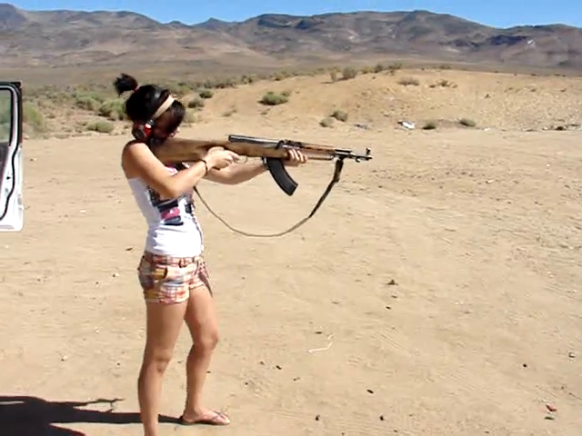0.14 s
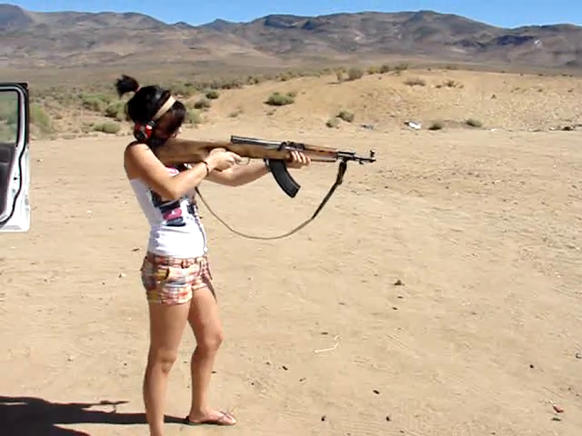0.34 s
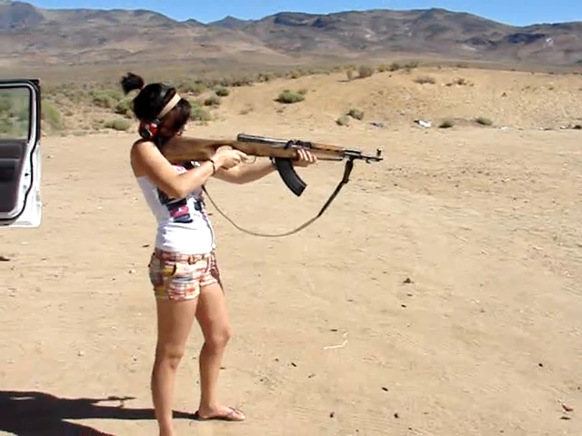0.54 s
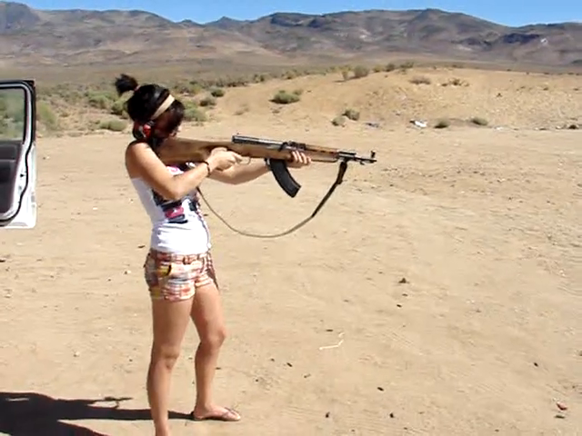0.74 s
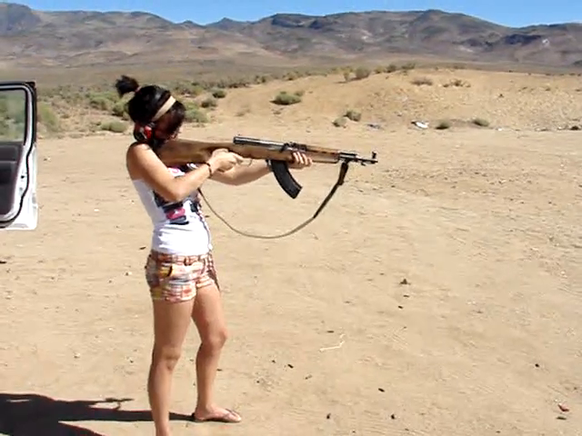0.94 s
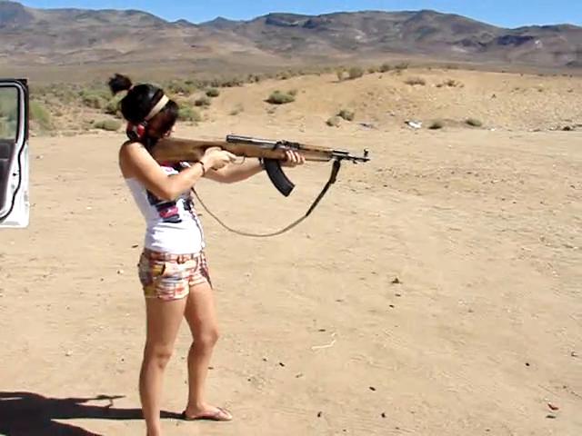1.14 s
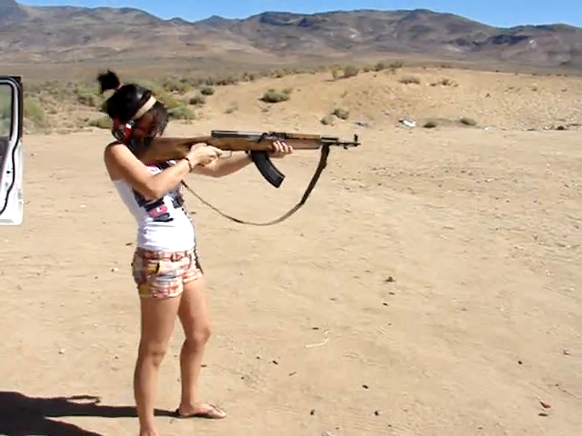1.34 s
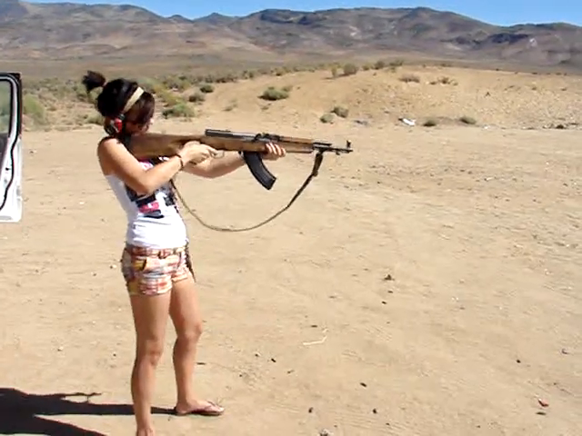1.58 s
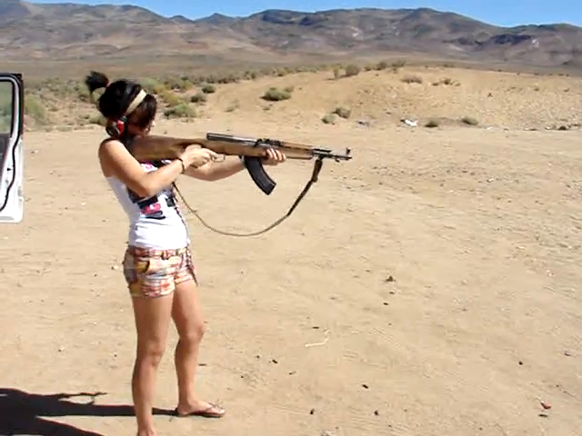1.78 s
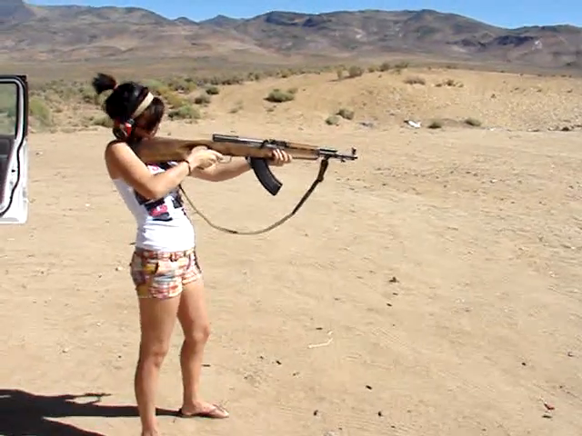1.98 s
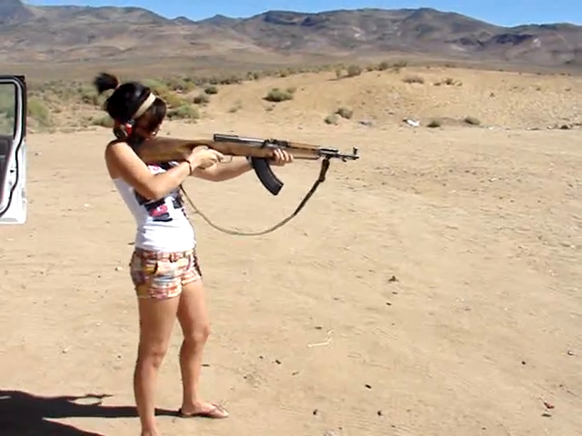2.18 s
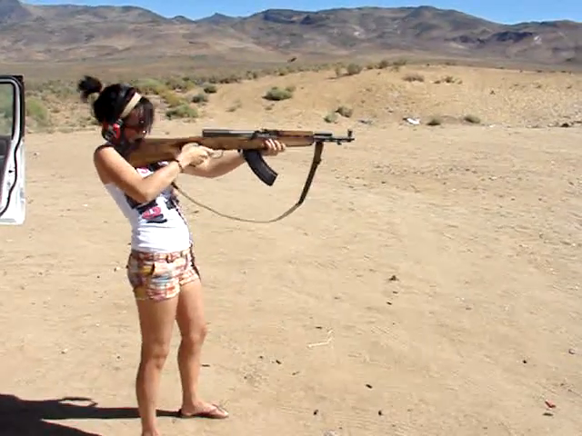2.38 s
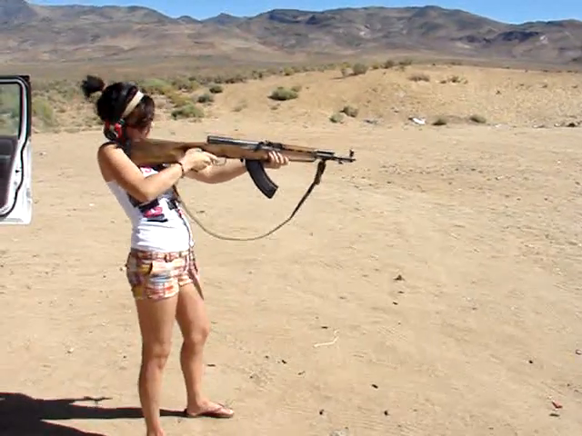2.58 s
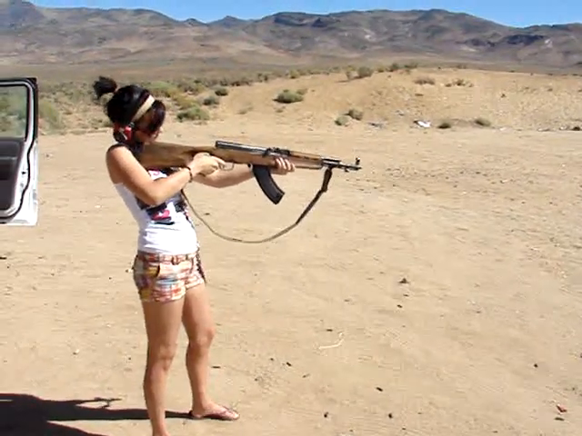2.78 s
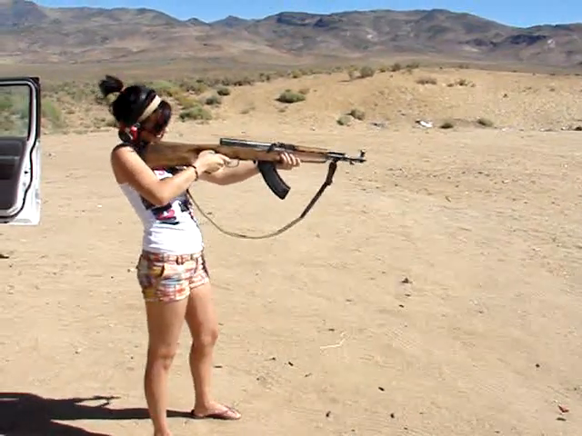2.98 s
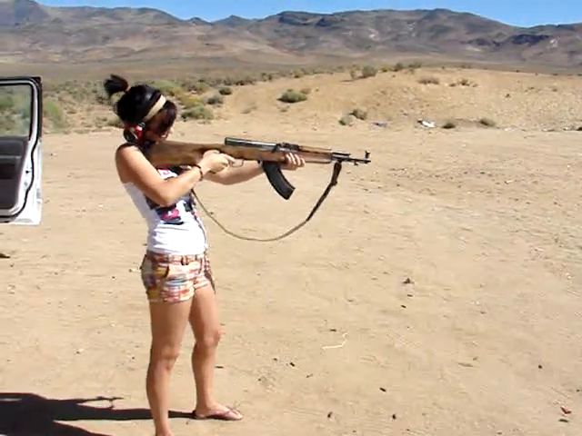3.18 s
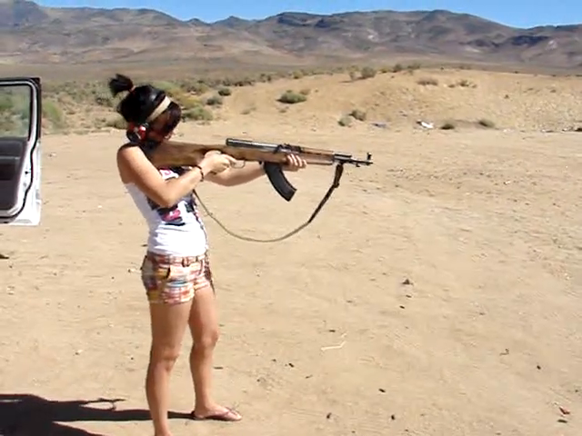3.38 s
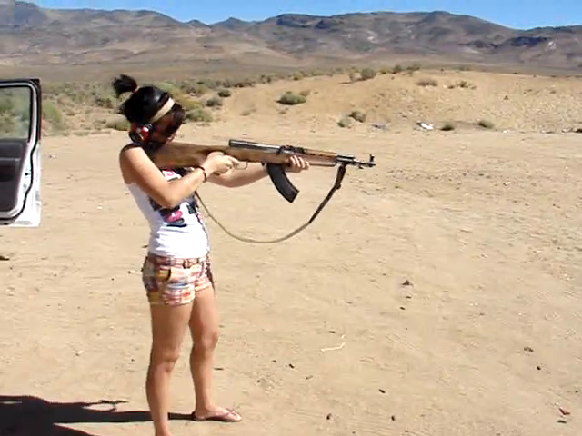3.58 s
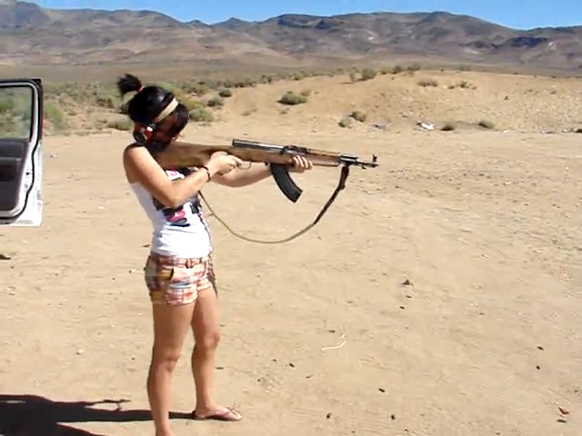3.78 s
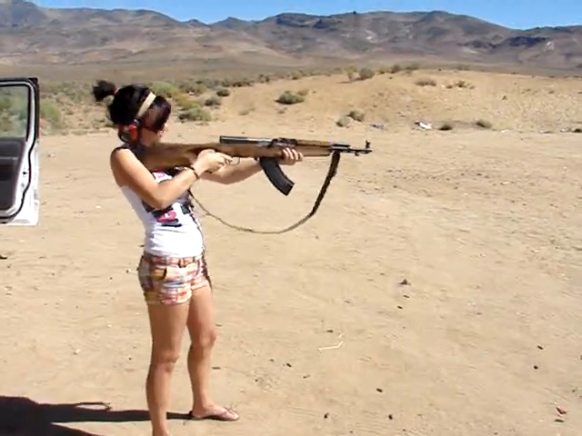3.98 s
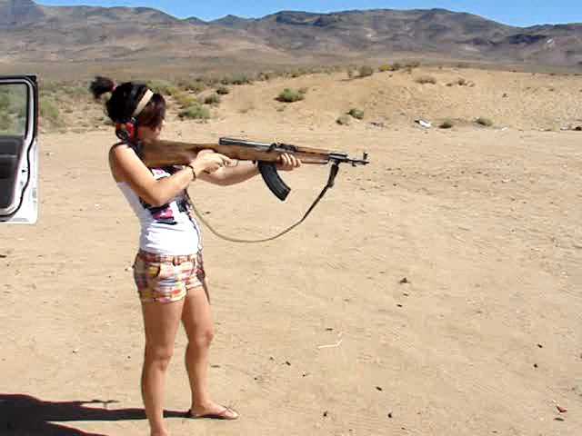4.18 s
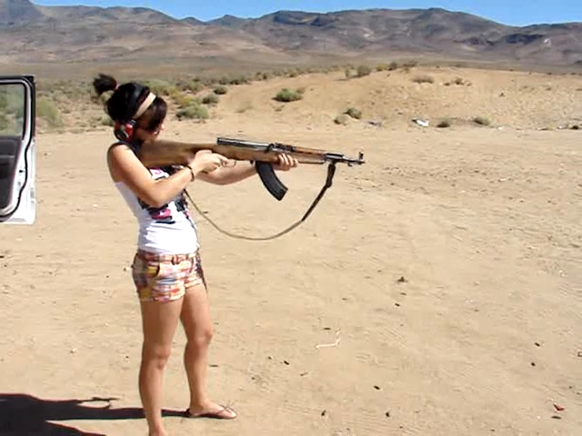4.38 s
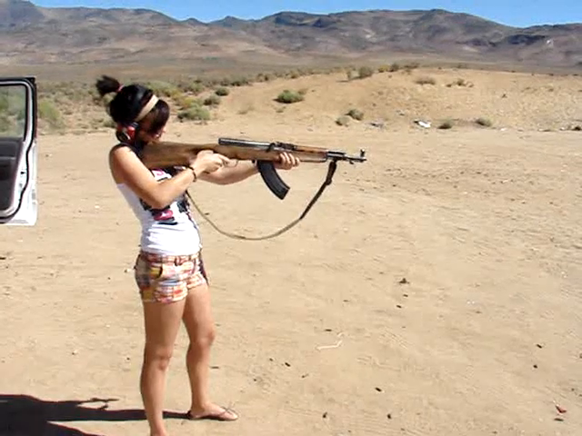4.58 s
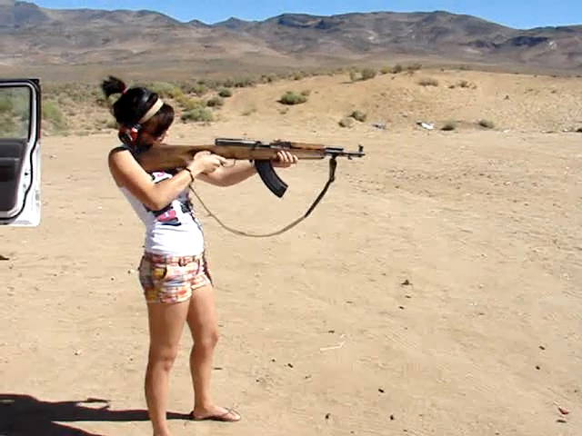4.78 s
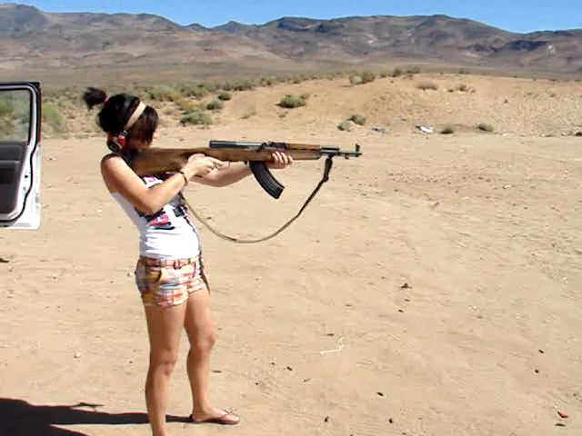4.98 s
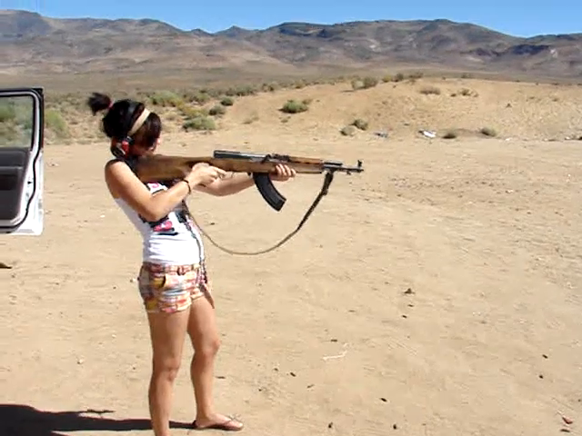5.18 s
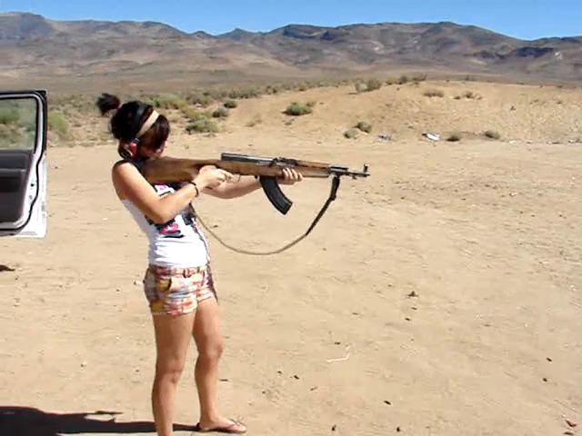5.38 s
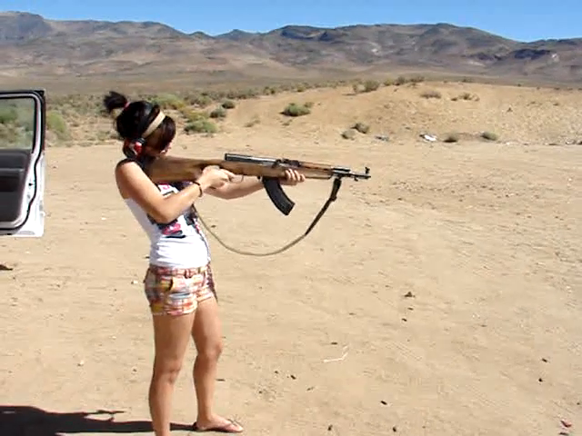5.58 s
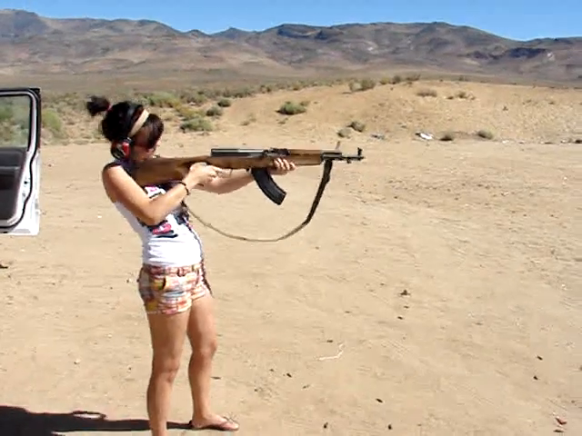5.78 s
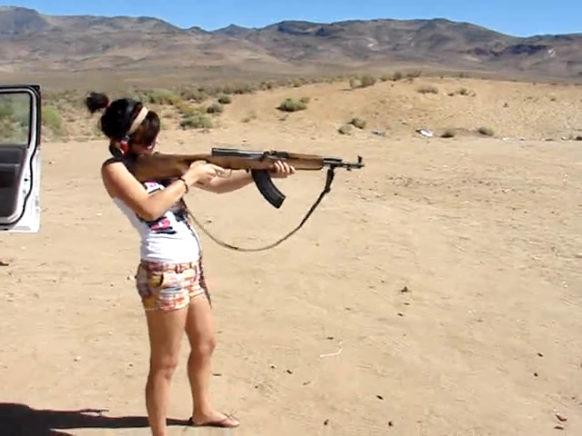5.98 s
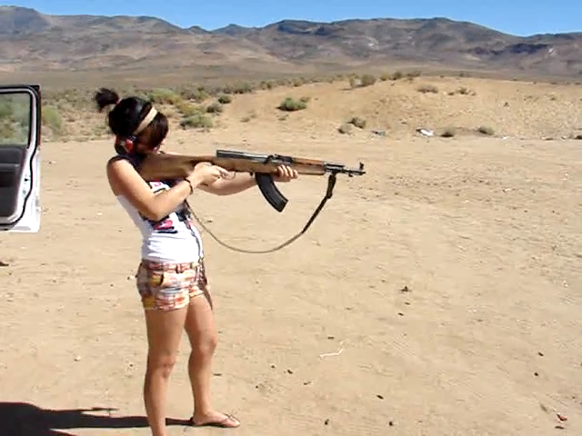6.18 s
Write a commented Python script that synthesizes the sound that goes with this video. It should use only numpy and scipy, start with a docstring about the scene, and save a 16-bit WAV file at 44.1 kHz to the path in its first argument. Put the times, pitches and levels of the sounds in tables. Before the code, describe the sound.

Outdoors in open desert, wind thumps and flutters against a small cheap microphone over steady hiss, growing strong just before the first rifle shot. The wind then drops away and four more single shots follow at uneven gaps. Each is a hard, distorted crack with a dense noisy burst, metallic action clatter, a bullet slap on dirt and a short echo. A few spent cases tick faintly on gravel.

```python
"""Wind buffets a small microphone over a steady hiss; then a rifle fires five single shots in open desert.
Wind is a crowd of random pressure swings plus strong placed ones; hiss and a faint whine are shaped noise.
Each shot is a spike of suction, then noise that swells and dies: blast returns from the ground, a car and
a low hill, and the clatter of the action. Rounded swings are bullets slapping the berm; short swings that
ring are spent cases ticking on gravel. The capsule stage bends and rounds loud sound and cuts the top."""
import sys
import numpy as np
from scipy import signal
from scipy.fft import rfft, irfft
from scipy.io import wavfile

SR = 44100
rng = np.random.default_rng(int(sys.argv[2]) if len(sys.argv) > 2 else 0)


def wav_record(signal):
    """Record a signal, one row per channel, as 16-bit PCM in the file named by sys.argv[1]."""
    frames = np.transpose(np.atleast_2d(signal))
    bounded = np.clip(frames, -1, 1)
    # unit amplitude maps onto the largest positive 16-bit level
    quanta = np.round(bounded * 32767).astype(np.int16)
    wavfile.write(sys.argv[1], SR, quanta)


N = 275184


def from_db(db):
    """Turns a level in dB into a plain multiplier."""
    return 10 ** (np.asarray(db) / 20)


def rms_one(x):
    """Scales x so that its average strength (rms) is 1."""
    return x / np.sqrt(np.mean(x ** 2) + 1e-20)


def noise(length=N):
    """Plain white noise: every sample is an independent random number."""
    return rng.standard_normal(length)


def in_time(rows):
    """Draws straight lines between the rows of a curve, giving a value for every sample."""
    seconds, *columns = np.transpose(rows)
    return [np.interp(np.arange(N) / SR, seconds, column) for column in columns]


def band(x, hz, octaves):
    """Keeps a band of pitches around hz, with gentle edges."""
    edges = np.clip(hz * 2.0 ** (np.array([-.5, .5]) * octaves), 15, 18000)
    return signal.sosfilt(signal.butter(3, edges, "band", fs=SR, output="sos"), x)


def coloured(x, spectrum):
    """Weights each frequency of x by a drawn curve, then sets the rms to 1."""
    hz, db = np.transpose(spectrum)
    grid_hz = np.maximum(np.arange(N // 2 + 1) * SR / N, 1)
    gain = from_db(np.interp(np.log(grid_hz), np.log(hz), db))
    return rms_one(irfft(rfft(x) * gain, N))


def lumps(cutoff_hz):
    """Slow random wandering: low-passed noise with rms 1."""
    low_pass = signal.butter(2, cutoff_hz, fs=SR, output="sos")
    return rms_one(signal.sosfilt(low_pass, noise(N + SR))[SR:])  # drop the first second, while it settles


def add(out, s, sound):
    """Mixes sound into out, starting at s seconds."""
    i = round(s * SR)
    out[i:i + len(sound)] += sound[:N - i]


EDDY_CENTRE_S = 12 / 1000


def eddy(hz, cycles):
    """A smooth dip and rise in pressure, peak 1, with its middle 12 ms after its start."""
    t = np.arange(-SR * 12 // 1000, SR * 12 // 1000 + 1) / SR
    swing = np.sin(2 * np.pi * hz * t) * np.exp(-(t * hz / cycles) ** 2)
    return swing / np.abs(swing).max()


# How strong and how sharp the wind is: (time [s], level [dB], sharpness [dB])
WIND_CURVE = [(0, -17, -21), (.09, -30.5, -17.5), (.21, -16.5, -26), (.38, -29, -18), (.43, -20.5, -21.5),
              (.57, -29, -22.5), (.72, -14.5, -19), (.81, -22.5, -24.5), (.91, -11.5, -14),
              (1.2, -13.5, -14), (1.41, -9, -22), (1.5, -43.5, 8), (1.93, -40.5, -11.5),
              (2.3, -33.5, -16.5), (2.55, -50.5, -17), (3.7, -46, -15.5), (3.755, -30, -18),
              (3.8, -39.5, -35), (3.98, -42, -10), (4.15, -55, -12), (4.47, -44, -17.5), (4.66, -44, -15),
              (4.75, -70, 3), (4.85, -48, -17), (5.06, -53, -13), (5.33, -47.5, -16), (5.47, -63, 0.5),
              (5.52, -40.5, -14), (5.77, -60, -12), (6.0, -61.5, -1), (6.24, -36.5, -20.5)]
# Eddy sizes, large to small: (centre frequency [Hz], level [dB], share of the sharpness it follows [ratio])
SIZES = [(48.2, -23.5, 0.015), (99, -14.5, 0.035), (169, -12, 0.0073), (240, -14, 0.16), (407, -8.5, 0.86),
         (583, -11.5, 1.054)]
EDDIES_PER_S, EDDY_SPREAD_DB = 450, 3.5
LUMPS_HZ, LEVEL_LUMPS_DB, SHARP_LUMPS_DB = 13.8, 2.5, 1.5  # both curves also wander at random


def wind_eddies():
    """Eddies of every size cross the port at random; sharpness chiefly changes the level of small ones."""
    level_db, sharp_db = in_time(WIND_CURVE)
    level_db = level_db + LEVEL_LUMPS_DB * lumps(LUMPS_HZ)
    sharp_db = sharp_db + SHARP_LUMPS_DB * lumps(LUMPS_HZ)
    # Many weak hits and a few strong ones, pushing or pulling at random
    strength = from_db(EDDY_SPREAD_DB * np.minimum(rng.exponential(1, N), 4))
    strength = strength * rng.choice([-1, 1], N)
    hits = strength * (rng.random(N) < EDDIES_PER_S / SR)
    size_of_hit = rng.integers(0, len(SIZES), N)
    out = np.zeros(N)
    for k, (hz, db, share) in enumerate(SIZES):
        whirls = signal.fftconvolve(hits * (size_of_hit == k), eddy(hz, cycles=0.51), "same")
        out += from_db(level_db + db + share * sharp_db) * rms_one(whirls)
    return out


def rumble():
    """A very quiet, steady band of low noise beneath the wind."""
    return from_db(-62) * rms_one(band(noise(), hz=45, octaves=3.65))


# Colour of the preamplifier hiss: (frequency [Hz], relative level [dB])
HISS_COLOUR = [(290, -46.5), (500, -4), (779, -3.5), (873, -4), (1360, -2.5), (2060, -3), (6530, -8),
               (7600, -8.5), (10300, -10.5), (13400, -29), (22000, -120)]
# Slow change of the hiss, added to its base level: (time [s], level [dB])
HISS_CHANGE = [(0, 4.5), (1.4, 4.5), (1.9, 2.2), (3.0, 1.5), (6.24, 1.3)]
HISS_BASE_DB = -59


def preamp_hiss():
    """The preamplifier's hiss: coloured noise whose level drifts slowly."""
    level_db = HISS_BASE_DB + in_time(HISS_CHANGE)[0]
    return from_db(level_db) * coloured(noise(), HISS_COLOUR)


# Level of the faint whine: (time [s], level [dB])
WHINE_CURVE = [(0, -61), (.8, -59), (1.8, -75), (3.2, -75), (3.45, -67), (3.95, -65), (4.4, -75),
               (6.24, -77)]
WHINE_HZ, WHINE_WIDTH_HZ, WHINE_WAVER_DB = 855, 90, 3


def faint_whine():
    """A narrow band of noise sounds like an unsteady pitch; its level also wavers."""
    octaves = WHINE_WIDTH_HZ / WHINE_HZ * 1.5  # about 1.5 octaves per unit of relative width
    level_db = in_time(WHINE_CURVE)[0] + WHINE_WAVER_DB * lumps(6)
    return from_db(level_db) * rms_one(band(noise(), WHINE_HZ, octaves))


# The strongest eddies, one by one: (time [s], peak level [dB], centre frequency [Hz])
STRONG_EDDIES = [(0.1254, -26, 325), (0.1986, -24.5, 209), (0.422, -28, 263), (0.699, -24, 215),
                 (0.7303, -19, 292), (0.847, -17, 264), (0.873, -18, 287), (0.9077, -6.5, 354),
                 (0.955, -12.5, 258), (0.9849, -11.5, 226), (1.0056, -9.5, 320), (1.0201, -8.5, 388),
                 (1.0569, -14, 494), (1.0787, -13, 215), (1.1072, -14, 397), (1.123, -14.5, 400),
                 (1.156, -7.5, 260), (1.1985, -11, 306), (1.246, -17, 300), (1.2888, -12, 240),
                 (1.313, -15.5, 355), (1.3534, -15, 278), (1.38, -13.5, 207), (2.1076, -31, 414),
                 (2.1412, -35, 322), (2.171, -28.5, 304), (2.1807, -33, 480), (2.2591, -31.5, 258),
                 (2.294, -32.5, 272), (3.2087, -41.5, 308), (3.7571, -33, 258), (3.9403, -43, 270),
                 (5.5263, -37.5, 450), (5.5576, -36, 305), (5.5949, -42.5, 290)]


def strong_eddies():
    """Each strong eddy is one dip and rise in pressure at the port."""
    out = np.zeros(N)
    for s, db, hz in STRONG_EDDIES:
        add(out, s - EDDY_CENTRE_S, from_db(db) * eddy(hz, cycles=0.47))
    return out


def crack():
    """The muzzle front: one very short, bell-shaped spike of suction at the capsule."""
    width_s = .00004
    return -np.exp(-.5 * (np.arange(16) / SR / width_s - 4) ** 2)


RETURN_T = np.arange(SR * 6 // 10) / SR  # time after a shot [s]


def returns(rows, rough_db):
    """Countless small reflections: noise in a band that swells, dies and arrives in clumps."""
    length = len(RETURN_T)
    out = np.zeros(length)
    for delay, db, rise, t60, hz, octaves in rows:
        since = np.maximum(RETURN_T - delay, 0)
        shape = (1 - np.exp(-since / rise)) * from_db(-60 * since / t60)
        clumps = from_db(rough_db * rms_one(band(noise(length), 76.5, 4.82)))
        grains = rms_one(band(noise(length), hz, octaves))
        out += from_db(db) * shape * rms_one(clumps) * grains
    return out


# Near returns of the blast; t60 is the time to fall by 60 dB:
# (delay [s], level [dB], rise time [s], t60 [s], centre frequency [Hz], width [octaves])
NEAR_RETURNS = [(0.00014, -11, 0.00021, 0.052, 4700, 1.7), (0.0012, -10, 0.0033, 0.16, 1690, 2.97),
                (0.0015, -32.5, 0.00082, 0.23, 4550, 0.33), (0.004, -16, 0.0048, 0.05, 2400, 1.04),
                (0.015, -7.5, 0.0055, 0.093, 2620, 1.21), (0.0078, -21.5, 0.0087, 0.33, 427, 1.98),
                (0.032, -21.5, 0.0024, 0.24, 1850, 1.86), (0.0014, -35, 0.003, 0.055, 78, 2.55),
                (0.074, -30, 0.011, 0.18, 2160, 1.4), (0.009, -19, 0.0055, 0.16, 9800, 1.9)]


def blast():
    """Near reflections of the blast, held down for a short lull after the crack."""
    lull_s, lull_db = .0026, -11
    return from_db(lull_db * (RETURN_T < lull_s)) * returns(NEAR_RETURNS, rough_db=3.0)


# The action cycling:
# (delay [s], level [dB], rise time [s], t60 [s], centre frequency [Hz], width [octaves])
ACTION_CLATTER = [(0.0475, -11, 0.001, 0.026, 6200, 0.58), (0.0636, -9.5, 0.0044, 0.036, 6300, 1.06),
                  (0.069, -10.5, 0.0024, 0.066, 3880, 1.86), (0.058, -21, 0.0036, 0.11, 3240, 0.91)]


def action(pace):
    """The rifle's action clatters in bursts of noise; a higher pace brings them sooner."""
    paced = [(delay / pace, *rest) for delay, *rest in ACTION_CLATTER]
    return returns(paced, rough_db=2.5)


# Returns from scrub and hillside; the last row is the last ridge:
# (delay [s], level [dB], rise time [s], t60 [s], centre frequency [Hz], width [octaves])
HILL_RETURNS = [(.10, -40, 0.033, 1.45, 1480, 1.3), (.10, -37, 0.053, 0.88, 392, 1.84),
                (.13, -51.5, 0.0062, 0.61, 6400, 1), (.20, -38, 0.04, 0.71, 1800, 1.93),
                (.12, -42.5, 0.028, 0.64, 2950, 0.64), (.228, -36, 0.0094, 0.083, 3970, 1.5),
                (.272, -26.5, 0.0076, 0.078, 2350, 0.9), (.15, -54, 0.059, 0.85, 4440, 1.5),
                (.275, -46.5, 0.0065, 0.19, 5230, 0.95), (.31, -42, 0.018, 0.18, 1070, 0.82),
                (.41, -53.5, 0.012, 0.16, 2520, 1.6)]
HORIZON_S, HORIZON_FADE_S = 0.329, 0.076


def hillside():
    """Far echoes fade out where the hillside ends; only the last ridge is left to sound after that."""
    fade = np.clip((HORIZON_S - RETURN_T) / HORIZON_FADE_S + 1, 0, 1) ** 2
    slope = fade * returns(HILL_RETURNS[:-1], rough_db=1.5)
    return slope + returns(HILL_RETURNS[-1:], rough_db=1.5)


# The five shots: (time [s], crack level [dB], blast level [dB], action level [dB],
# far echo level [dB], pace of the action [ratio])
SHOT_LIST = [(1.4464, 0, 3, -4, 3, 0.99), (2.4043, -7, 1.7, -5, 0.8, 0.94),
             (4.002, -5.5, 2.34, -3, 0.8, 1.01), (4.9101, -5, 1.34, -6.5, -1, 1.02),
             (5.8045, -4.5, 1.7, -5.5, -0.7, 0.91)]


def rifle():
    """Every shot adds a muzzle crack, near returns, the action and the hillside."""
    out = np.zeros(N)
    for s, crack_db, blast_db, action_db, echo_db, pace in SHOT_LIST:
        add(out, s, from_db(crack_db) * crack())
        add(out, s, from_db(blast_db) * blast())
        add(out, s, from_db(action_db) * action(pace))
        add(out, s, from_db(echo_db) * hillside())
    return out


# Bullets slapping the berm: (time [s], peak level [dB], centre frequency [Hz])
BERM_SLAPS = [(1.5357, -7, 1810), (2.5025, -5.5, 3180), (2.5057, -6.5, 1660), (4.093, -6, 1830),
              (5.9022, -8.5, 3470), (5.9059, -12, 1990)]


def slaps():
    """Each slap is one rounded swing, a rise in pressure and then a dip."""
    out = np.zeros(N)
    for s, db, hz in BERM_SLAPS:
        add(out, s - EDDY_CENTRE_S, -from_db(db) * eddy(hz, cycles=0.33))
    return out


def pulse(hz, cycles):
    """A short pressure swing that dies away, suction first, peak 1."""
    t = np.arange(round(6 * cycles / hz * SR)) / SR
    swing = -np.cos(2 * np.pi * hz * t) * np.exp(-t * hz / cycles) * np.minimum(t * hz * 8, 1)
    return swing / np.abs(swing).max()


# Spent cases ticking on gravel: (time [s], peak level [dB], centre frequency [Hz])
CASE_TICKS = [(2.3370, -31, 2300), (2.3470, -37, 3000), (3.3688, -27, 2030), (3.3711, -30, 2010),
              (5.5452, -25.5, 3000), (5.5462, -30, 2030), (5.5790, -42, 3020)]
# Ways in which a case rings: (frequency [Hz], level [dB], t60 [s])
CASE_MODES = [(700, -30, .012), (1400, -26, .008), (2200, -25, .008), (4200, -26, .004)]


def cases():
    """Each tick is a short swing that sets the modes of the case ringing."""
    ticks = np.zeros(N)
    for s, db, hz in CASE_TICKS:
        add(ticks, s, from_db(db) * pulse(hz, cycles=.45))
    out = ticks.copy()
    for hz, db, t60 in CASE_MODES:
        r = from_db(-60 / (t60 * SR))  # what is left of the ringing after one sample
        w = 2 * np.pi * hz / SR  # turn per sample [radians]
        ringing = signal.lfilter([0, np.sin(w)], [1, -2 * r * np.cos(w), r * r], ticks)
        out += from_db(db) * ringing
    return out


def scene():
    """Adds up the wind, the steady floor, the rifle, the slaps and the cases."""
    wind = wind_eddies() + rumble() + strong_eddies()
    floor = preamp_hiss() + faint_whine()
    return (wind + floor + rifle() + slaps() + cases())[None]


LOPSIDED, CEILING = 0.62, .88  # share of square-law bend; level that rounded peaks approach
COUPLING_HZ, CUTOFF_HZ = .45, 10500  # coupling capacitor; the top is 60 dB down from the cutoff


def record(dry):
    """The capsule stage bends loud sound to one side, so the zero line sags and creeps back."""
    bent = dry - LOPSIDED * np.clip(dry, -1, 1) ** 2
    rounded = CEILING * np.tanh(bent / CEILING)
    coupled = signal.lfilter(*signal.butter(1, COUPLING_HZ, "high", fs=SR), rounded)
    return signal.sosfilt(signal.cheby2(16, 60, CUTOFF_HZ, fs=SR, output="sos"), coupled)


dry = scene()
out = record(dry)
wav_record(out)
```